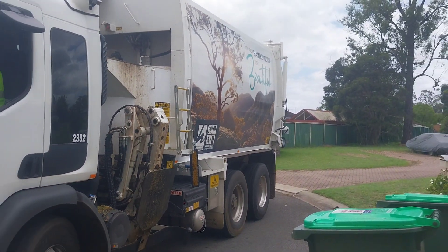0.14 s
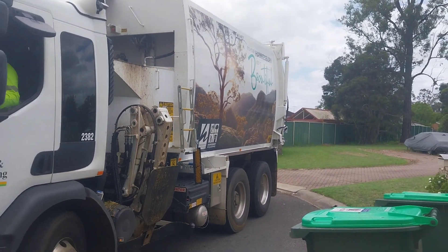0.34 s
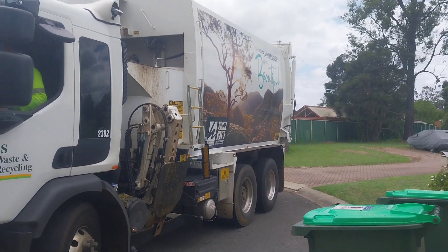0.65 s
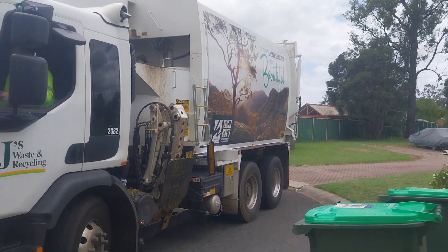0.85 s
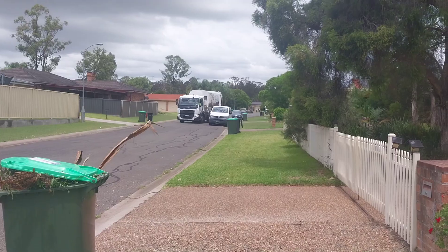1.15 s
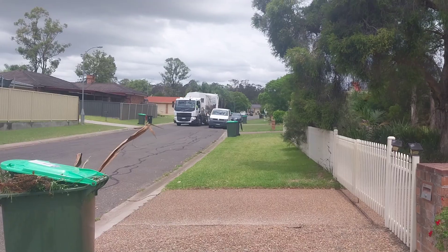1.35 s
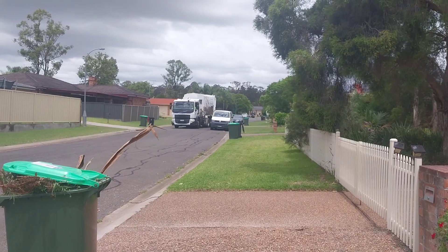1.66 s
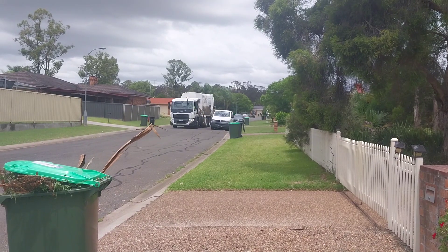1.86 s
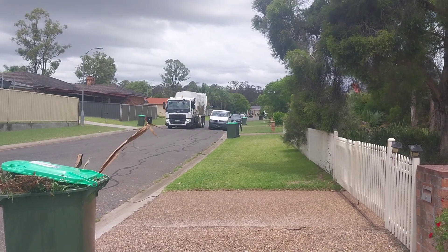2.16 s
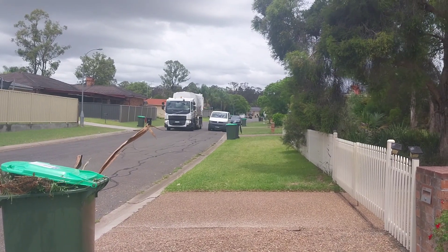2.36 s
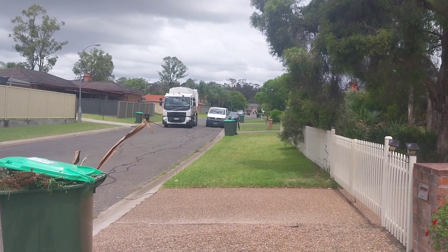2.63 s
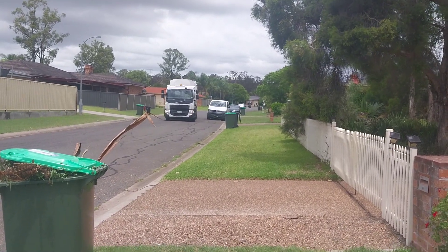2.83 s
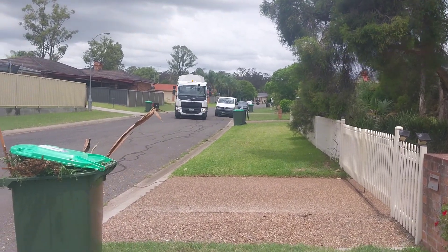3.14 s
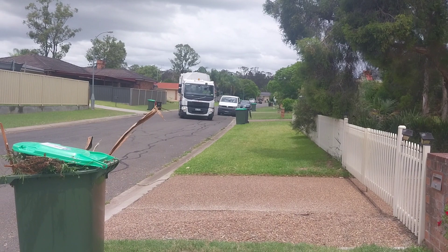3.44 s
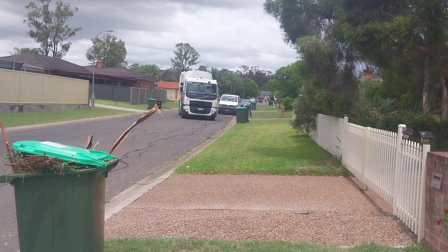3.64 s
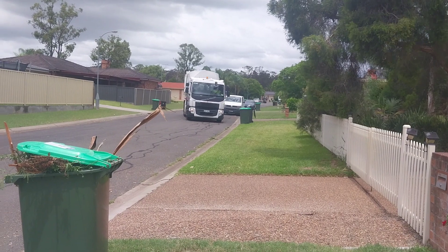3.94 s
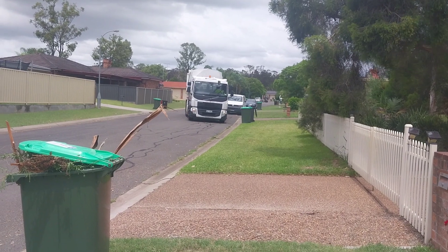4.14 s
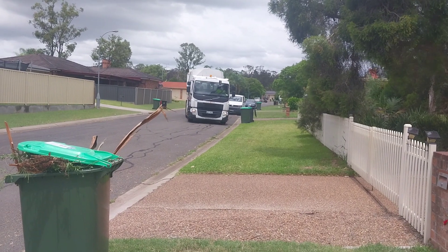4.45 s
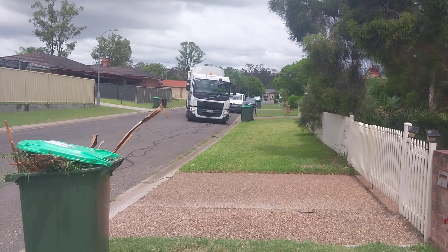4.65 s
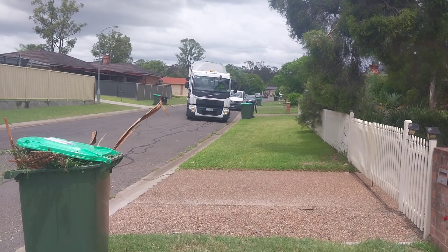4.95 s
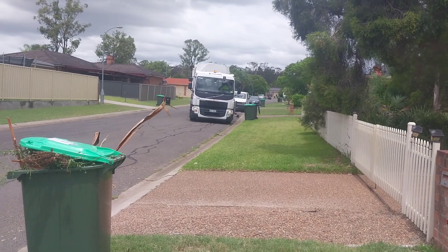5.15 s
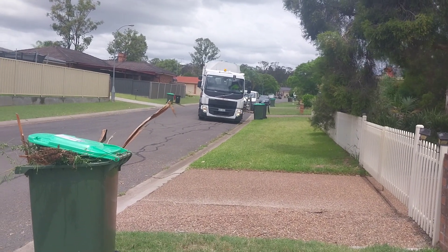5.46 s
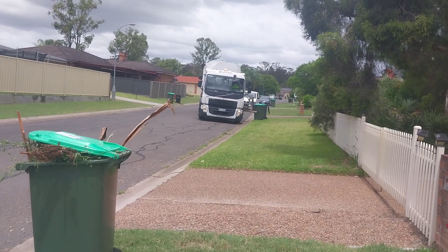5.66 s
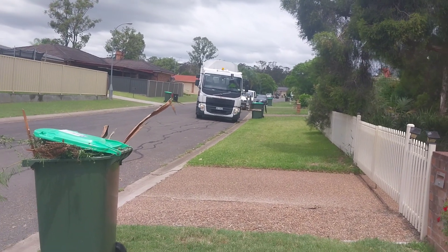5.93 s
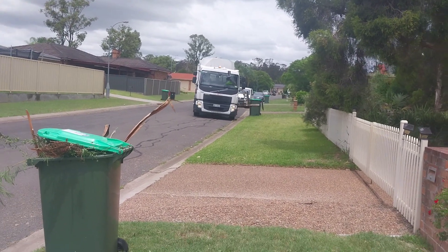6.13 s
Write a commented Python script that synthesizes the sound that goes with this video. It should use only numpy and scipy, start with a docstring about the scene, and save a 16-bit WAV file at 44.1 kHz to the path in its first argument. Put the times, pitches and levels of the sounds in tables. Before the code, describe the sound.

Outdoor handheld camera with stereo microphones. First a loud nearby idle, low and pulsing, under steady oil hiss with a thin sinking whistle, ending in booming steel clanks. A hard cut drops to a far diesel losing revs along the street, lumpy wind on the microphones and a high, stuttering lens-gear whirr close up. Brakes scrape and squeak, a bird chirps on the right, and looser metallic knocks close it.

```python
"""In a street, a garbage truck idles close by: engine noise pulses, oil hisses and the bin arm clanks.
After a cut the truck is far down the breezy street. Its diesel slows as it nears, an air valve puffs,
the brakes squeal and the arm clatters out. A camera's zoom motor buzzes in quick steps and a bird chirps.
Engine, oil, air and wind are shaped noise; squeals, gear whine and chirps are tones with a moving pitch;
each blow of the arm is a set of fading tones plus a burst of noise."""
import sys
import numpy as np
from scipy import signal
from scipy.fft import rfft, irfft, next_fast_len
from scipy.io import wavfile
from scipy.ndimage import uniform_filter1d, map_coordinates

SR = 44100
rng = np.random.default_rng(int(sys.argv[2]) if len(sys.argv) > 2 else 0)


def wrap_up_sound(samples):
    """Save the sound to the file named by the first command line argument, as 16-bit audio."""
    columns = np.atleast_2d(samples).T
    # keep every value between -1 and 1, then stretch to whole-number steps
    tamed = np.clip(columns, -1, 1)
    steps = np.round(tamed * 32767).astype(np.int16)
    wavfile.write(sys.argv[1], SR, steps)


N = 277389
TIME = np.arange(N) / SR
CUT_S = 1.042  # the close scene ends and the street scene begins
TOP_HZ = 15800  # nothing is kept above this pitch

# Truck body shaken by the close engine, relative spectrum: f/Hz, level/dB
BODY_SPECTRUM = [(18, -43), (30, -29), (81, -4), (117, -5), (170, -0.5), (214, 2.5), (252, -3.5), (287, -1),
                 (433, -10), (540, -12.5), (700, -27.5), (1000, -13.5), (1300, -31), (2200, -120)]
# Hiss of oil through the valves, relative spectrum: f/Hz, level/dB
OIL_SPECTRUM = [(470, -3), (800, 0.5), (1040, -17.5), (1130, 0.5), (1280, -3.5), (1750, -6), (2380, -4.5),
                (3090, -6.5), (3770, -6), (4600, -6), (5010, -5.5), (6590, -15), (8650, -34),
                (11100, -17.5), (15500, -29.5)]
# Side the hiss comes from: f/Hz, left minus right/dB
OIL_SIDE = [(1000, -2), (4200, -10), (6000, -14.5), (8200, 4), (10800, -10), (13000, 4)]
# Body panels that ring with the hiss: f/Hz, width/Hz, relative level/dB
PANEL_MODES = [(1124, 29, 4), (2370, 61, -5), (2830, 65, -1), (3720, 100, -2)]
OIL_DB = -27
# A thin valve whistle that slowly sinks; its level is relative to the hiss
WHISTLE_HZ, WHISTLE_SAG_HZ_PER_S, WHISTLE_DB = 5130, 320, -18.5

# Small dry ticks: t/s, starting level/dB, centre f/Hz
TICKS = [(0.47, -20, 2800), (2.414, -29, 1300), (2.911, -30.5, 1300), (3.012, -22.5, 560)]

# Blows of the arm: t/s, thud level before a 7.5 dB cut/dB, thud f/Hz, clash level/dB,
# clash centre f/Hz, time for the clash to fade by 60 dB/s
ARM_BLOWS = [(0.873, -10, 212, -21.5, 4170, 0.18), (.882, -2, 299, -19, 4140, 0.16),
             (.907, -2, 186.5, -28, 1250, 0.088), (0.954, -8, 162.4, -25.5, 4100, 0.091),
             (1, -8, 207, -38, 1000, .05), (5.986, -16, 299, -28.5, 1110, 0.12),
             (5.997, -11.5, 173, -22.5, 1120, 0.028), (6.008, -20, 151, -27.5, 2110, 0.06),
             (6.017, -14, 133.2, -16, 1550, 0.016), (6.054, -12.5, 105, -26, 2150, 0.06),
             (6.108, -21, 260, -26.5, 4620, 0.037), (6.125, -27, 264, -29, 1390, 0.09)]
# Tones of the hollow body: ratio to the thud pitch, relative level/dB, time to fade by 60 dB/s
ARM_TONES = [(.62, -6, 0.19), (1.002, 7, 0.082), (1.17, -12, 0.35), (1.6, -11, 0.11)]
CHATTER_DB, CHATTER_HZ = 3, 300  # loose joints chatter within each clash: depth and rate
REBOUND_S, REBOUND_LOSS_DB = 0.021, 14  # the slack linkage strikes once more after each blow

# Far engine: t/s, firings a second/Hz, load/dB
ENGINE_REVS = [(1.4, 68.6, -1), (2.1, 64.4, 1), (2.5, 54.6, -0.5), (3.0, 44, -6), (3.95, 45, -3.5),
               (4.25, 43.5, -8.5), (4.85, 45, -7.5), (5.4, 43, -4.5), (6.29, 39, -4)]
RUMBLE_DB, BLOCK_DB = -35, -43  # rumble and block clatter at a load of 0 dB
EXHAUST_DB, EXHAUST_DB_PER_OCTAVE = -39.5, 12  # the puffs weaken as the revs fall
# Distance dulls the clatter above this pitch; the treble level rises as the truck nears
TREBLE_HZ, TREBLE_DB, TREBLE_DB_PER_S = 2800, -6, 2.21
# Brief surges of the rumble: t/s, rise in level/dB
RUMBLE_SURGES = [(1.32, 2.5), (3.17, 5.5), (4.56, 9.5), (5.4, 6.5), (6.18, 6.5)]
SURGE_S, CLATTER_SHARE = 0.1, 0.54  # width of a surge, and how far the clatter joins in
# Exhaust and rumble, relative spectrum: f/Hz, level/dB
RUMBLE_SPECTRUM = [(29, -38), (50, -10), (130, -10.5), (200, 3.5), (290, -1.5), (450, -10), (600, -24),
                   (900, -38), (1400, -42)]
# Clatter of the engine block, relative spectrum: f/Hz, level/dB
CLATTER_SPECTRUM = [(300, -1), (500, 4.5), (900, -2), (1300, -1.5), (2500, -1.5), (3500, -7), (5000, -4.5),
                    (15000, -32)]
# Resonances of the engine block: f/Hz, width/Hz, relative level/dB
BLOCK_MODES = [(974, 160, 8), (1614, 98, 1), (2410, 510, -6)]
# Resonances of the engine under throttle: f/Hz, width/Hz, relative level/dB
ROAR_MODES = [(425, 190, 0), (836, 230, -3), (2350, 310, -9)]
ROAR_DB, ROAR_AT_S, ROAR_S = -43, 1.5, 0.76  # level at the peak, time and width of the pull
# Exhaust drone: multiple of the firing rate, relative level/dB
DRONE_ORDERS = [(2.5, -4.5), (3, -2), (5, -7.5), (6, -6.5)]

# Gusts added to the breeze: t/s, level at the peak/dB
WIND_GUSTS = [(2.46, -35), (3.51, -34.5), (3.86, -34.5), (4.57, -27), (5.59, -50), (6.06, -28)]
BREEZE_DB, GUST_S = -38, 0.083  # wind between gusts, width of a gust
# Wind buffeting the microphones, relative spectrum: f/Hz, level/dB
WIND_SPECTRUM = [(15, -29), (30, -11), (55, -1.5), (95, 3), (140, -2.5), (250, -14.5), (600, -48)]

# Zoom motor, MOTOR_GAIN_DB is added to it: t/s, level/dB
MOTOR_LEVELS = [(1.08, -44.5), (1.25, -46), (2.33, -42), (4.73, -42), (4.77, -46), (5.59, -46),
                (5.9, -58.5)]
MOTOR_GAIN_DB = 3  # overall loudness of the zoom motor
# The gear tone swells once: level before the swell, rise, time, width
WHINE_DB, WHINE_RISE_DB, WHINE_AT_S, WHINE_S = -21, 14.5, 2.22, 0.45
# Whirr of the lens gears, relative spectrum: f/Hz, level/dB
GEAR_SPECTRUM = [(2940, -14), (5000, -15), (5430, -15), (6820, -4), (8310, -8.5), (9920, -0.5),
                 (10500, -4.5), (11300, -11.5), (12700, -16.5), (15500, -30)]
# Strands of gear whine: peak t/s, swell width/s, f at the peak/Hz, drift/(Hz/s), width/Hz, relative level/dB
GEAR_STRANDS = [(1.4, 0.63, 8700, 300, 450, -9), (1.9, 0.28, 7050, -200, 600, -9.5),
                (2.56, 0.11, 9640, -3, 110, -7), (2.62, 0.2, 6500, 0, 350, -11.5),
                (3.05, 0.13, 7640, 0, 1100, -3), (3.351, 0.15, 10000, -500, 800, -3.5),
                (3.6, 0.76, 6940, -200, 600, -16), (4.0, 0.081, 9740, -4, 1000, -3),
                (4.8, 0.39, 10040, -200, 130, -7), (5.2, 0.55, 6270, -600, 600, -10.5),
                (5.403, 0.28, 9630, -200, 150, -6)]

# Puffs of the air valve: t/s, swell width/s, centre f/Hz, width/Hz, level at the peak/dB
AIR_PUFFS = [(3.205, 0.035, 1840, 450, -42), (3.228, 0.033, 2770, 1100, -42)]

# Brake squeals: start t/s, length/s, starting f/Hz, glide/(Hz/s), starting level/dB
BRAKE_SQUEALS = [(4.216, 0.2, 13200, 864, -53), (4.35, .35, 12100, 0, -50),
                 (4.772, 0.55, 13370, 200, -50.5), (4.943, 0.35, 11800, 552, -49.5),
                 (5.183, 0.15, 13880, 1200, -57), (5.489, 0.06, 2620, -1000, -33),
                 (5.54, 0.11, 2614, -950, -32), (5.664, 0.069, 2660, -300, -39),
                 (5.777, 0.043, 2326, -1300, -35), (5.82, 0.14, 2290, -900, -45.5),
                 (6.142, 0.068, 5780, -4500, -41), (6.177, 0.11, 5380, 600, -37.5)]
WAVER_HZ, SQUEAL_FADE_DB = 42.3, 5  # how far the pitch wavers; drop in level over each squeal
SCRAPE_AT_S, SCRAPE_S, SCRAPE_DB = 3.45, 0.19, -47.5  # rough scrape: peak time, width, peak level
SCRAPE_HZ, SCRAPE_SAG_HZ_PER_S, SCRAPE_WIDTH_HZ = 1685, 140, 160

# Bird chirps: t/s, level/dB
BIRD_CHIRPS = [(4.895, -52), (5.625, -46.5)]


def amp(db):
    """Turns decibels into a gain."""
    return 10 ** (np.asarray(db) / 20)


def unit(x):
    """x scaled to an average strength (rms) of 1."""
    return x / np.sqrt(np.mean(x ** 2) + 1e-20)


def along(points, hz):
    """Reads a curve of (Hz, value) points on a log pitch axis."""
    f, value = np.transpose(points)
    return np.interp(np.log(hz + 1), np.log(f + 1), value)


def curves(rows):
    """One value per sample for each column after the time."""
    s, *columns = np.transpose(rows)
    return [np.interp(TIME, s, column) for column in columns]


def swells(rows, width_s):
    """A bell-shaped swell for each (time, height) row."""
    return sum(height * np.exp(-.5 * ((TIME - s) / width_s) ** 2) for s, height in rows)


def wobble(rate, size=N):
    """A smooth random curve through a given number of random points a second."""
    knots = rng.standard_normal(int(size * rate / SR) + 4)
    return map_coordinates(knots, [TIME[:size] * rate])


def filtered(x, response):
    """x with each pitch multiplied by a response."""
    n = x.shape[-1]
    m = next_fast_len(n + 8192)
    return irfft(rfft(x, m) * response(np.fft.rfftfreq(m, 1 / SR)), m)[..., :n]


def pair(alike, size=N):
    """White noise at two microphones that hear a share of it alike."""
    a, b = rng.standard_normal((2, size))
    turn = np.arccos(np.clip(alike, 0, 1)) / 2
    return np.cos(turn) * a + np.sin(turn) * np.array([b, -b])


def shaped(x, spectrum):
    """x coloured by a spectrum, at rms 1."""
    return unit(filtered(x, lambda hz: amp(along(spectrum, hz))))


def resonate(x, modes):
    """x through (Hz, width, dB) resonances, at rms 1."""
    def response(f):
        return sum(amp(db) * 1j * f * w / (c * c - f * f + 1j * f * w) for c, w, db in modes)
    return unit(filtered(x, response))


def band(x, centre_hz, octaves):
    """x through a bell-shaped band, at rms 1."""
    return unit(filtered(x, lambda f: np.exp(-.5 * (np.log2((f + 1) / centre_hz) / octaves) ** 2)))


def narrow(hz, width_hz):
    """A fuzzy tone at both microphones that follows a pitch curve, at rms 1."""
    haze = np.array([wobble(width_hz) + 1j * wobble(width_hz) for _ in range(2)])
    turns = np.cumsum(hz * np.ones(N)) / SR
    return unit(np.real(haze * np.exp(2j * np.pi * turns)))


def patchy(x, depth_db):
    """x with patches of neighbouring bands swelling and sinking at random, at rms 1."""
    z = signal.stft(x, nperseg=512)[2]
    field = rng.standard_normal(z.shape[1:])
    for _ in range(2):  # smooth over pitch, then over time
        field = uniform_filter1d(field, size=3, axis=0)
        field = uniform_filter1d(field, size=18, axis=1)
    return unit(signal.istft(z * amp(depth_db * unit(field)), nperseg=512)[1][:, :N])


def widened(x):
    """Stereo widening: each channel gets a late, duller copy of the other; sum and difference get opposite combs."""
    def late_copy(hz):  # 1/820 s late
        return .8 * np.exp(-(hz / 4500) ** 2) * np.exp(-2j * np.pi * hz / 820)
    return unit(x + filtered(x[::-1], late_copy))


def ringing(x, t60, wet_db):
    """x with a dense tail, from a housing's many modes or from the house fronts."""
    t = TIME[:SR // 3]
    tail = rng.standard_normal((2, len(t))) * amp(-60 * t / t60)
    wet = signal.fftconvolve(x, tail / np.linalg.norm(tail[0]), axes=1)[:, :N]
    return (x + amp(wet_db) * wet) / np.hypot(1, amp(wet_db))


def pan(db):
    """Gains for a source that is db louder on the left."""
    return amp(np.array([[db], [-db]]) / 2)


def add(out, s, x):
    """Mixes x into out from time s on."""
    part = out[:, round(s * SR):][:, :x.shape[-1]]
    part += x[..., :part.shape[1]]


def firings(rate, scatter_db):
    """A ringing puff per firing of six unequal cylinders, and the phase of the firing cycle."""
    turns = np.cumsum(rate * (1 + .008 * wobble(12))) / SR
    at = np.flatnonzero(np.diff(np.floor(turns)))
    cylinders = rng.standard_normal(6)[np.arange(len(at)) % 6]
    pulses = np.zeros(N)
    pulses[at] = amp(scatter_db * (cylinders + rng.standard_normal(N)[at]))
    t = TIME[:SR // 10]
    pipe = rng.standard_normal(len(t)) * amp(-60 * t / 0.19)  # each puff rings on in the exhaust
    return signal.fftconvolve(pulses, pipe)[:N], 2 * np.pi * turns


def idling():
    """The close diesel shakes the body; oil hisses unevenly through the valves and rings the panels."""
    pulses, phase = firings(rate=32.4, scatter_db=-1.5)
    knock = amp(1.5 * np.cos(phase) + 1.8 * wobble(55))
    engine = amp(-28.5) * shaped(pulses, BODY_SPECTRUM)
    engine = engine + amp(-24.0) * shaped(pair(0.99) * knock, BODY_SPECTRUM)
    rattle = amp(1.1 * wobble(129.5) + 0.4 * np.cos(2 * phase))
    oil = amp(0.5) * shaped(pair(0.053) * rattle, OIL_SPECTRUM)
    oil += amp(-8.0) * resonate(pair(0.25) * rattle, PANEL_MODES)
    oil = patchy(oil, depth_db=1.0)
    oil += amp(WHISTLE_DB) * narrow(WHISTLE_HZ - WHISTLE_SAG_HZ_PER_S * TIME, width_hz=50)
    oil = filtered(oil, lambda hz: amp(along(OIL_SIDE, hz) * np.array([[.5], [-.5]])))
    oil = ringing(oil, t60=.15, wet_db=-10)
    return engine * pan(-1.7) + amp(OIL_DB) * oil


def ticks():
    """Each small tick close by is a burst of noise in a wide band that dies at once."""
    out, t = np.zeros((2, N)), TIME[:SR // 25]
    for s, db, hz in TICKS:
        add(out, s, amp(db - 60 * t / 0.018) * band(pair(0.6, len(t)), hz, octaves=0.85))
    return out


def arm():
    """Each blow booms in the hollow body while the steel linkage clashes and chatters."""
    out, t = np.zeros((2, N)), TIME[:SR // 3]
    rebounds = [(s + REBOUND_S, thud_db - REBOUND_LOSS_DB, thud_hz,
                 clash_db - REBOUND_LOSS_DB, clash_hz, clash_t60)
                for s, thud_db, thud_hz, clash_db, clash_hz, clash_t60 in ARM_BLOWS]
    for s, thud_db, thud_hz, clash_db, clash_hz, clash_t60 in list(ARM_BLOWS) + rebounds:
        boom = sum(amp(db + rng.normal(0, 1) - 60 * t / t60) * np.sin(2 * np.pi * ratio * thud_hz * t)
                   for ratio, db, t60 in ARM_TONES)
        chatter = amp(CHATTER_DB * np.clip(wobble(CHATTER_HZ, len(t)), -2, 1))
        strike = widened(pair(0.035, len(t))) * chatter
        steel = band(strike, clash_hz, octaves=0.3) + amp(-5) * band(strike, clash_hz, octaves=1.1)
        fade = amp(-60 * t / clash_t60) + amp(-19 - 60 * t / 0.45)  # a faint part has its own fade
        side = pan(-7.5) if s < CUT_S else pan(-1.15)
        blow = amp(thud_db - 7.5) * boom + amp(clash_db) * fade * unit(steel) * side
        add(out, s, blow * (1 - np.exp(-t / .003)))  # soften the first milliseconds
    heard = (TIME < CUT_S) | (TIME > 2 * CUT_S)  # the close blows end with the close scene
    return out * heard


def driving():
    """The far diesel loses revs and load; every firing puffs in the exhaust and rattles the block."""
    rate, load_db = curves(ENGINE_REVS)
    surge_db = swells(RUMBLE_SURGES, SURGE_S)
    firing_db = EXHAUST_DB + EXHAUST_DB_PER_OCTAVE * np.log2(rate / rate[0])
    rumble_db = RUMBLE_DB + load_db + surge_db
    clatter_db = BLOCK_DB + load_db + CLATTER_SHARE * surge_db
    pulses, phase = firings(rate, scatter_db=2.0)
    # each order fades and wavers on its way up the street
    drone = sum(amp(db + 4 * wobble(16)) * np.sin(k * phase + 1.4 * wobble(30))
                for k, db in DRONE_ORDERS)
    exhaust = amp(firing_db) * (shaped(pulses, RUMBLE_SPECTRUM) + unit(drone))
    rumble = amp(rumble_db + 2.3 * wobble(24)) * shaped(pair(0.9), RUMBLE_SPECTRUM)
    knocks = widened(pair(0)) * amp(0.93 * np.cos(phase) + 2.27 * wobble(30))
    clatter = shaped(knocks, CLATTER_SPECTRUM) + amp(-2.5) * resonate(knocks, BLOCK_MODES)
    treble = filtered(clatter, lambda hz: hz ** 4 / (hz ** 4 + TREBLE_HZ ** 4))
    treble_gain = amp(TREBLE_DB + TREBLE_DB_PER_S * (TIME - CUT_S))
    clatter = clatter + (treble_gain - 1) * treble  # brighter as the truck nears
    throttle = resonate(widened(pair(0.8)) * amp(1.5 * np.cos(phase)), ROAR_MODES)
    roar = swells([(ROAR_AT_S, amp(ROAR_DB))], ROAR_S) * throttle
    return (exhaust + rumble) * pan(-0.99) + (amp(clatter_db) * clatter + roar) * pan(-1.5)


def wind():
    """A light breeze with short, lumpy gusts buffets the microphones."""
    strength = amp(BREEZE_DB) + swells([(s, amp(db)) for s, db in WIND_GUSTS], GUST_S)
    return strength * shaped(pair(0.32) * amp(4.55 * wobble(25)), WIND_SPECTRUM)


def zoom_motor():
    """Lens gears whirr in uneven steps, easing off once a frame; strands of whine come and go."""
    motor_db, = curves(MOTOR_LEVELS)
    whine_db = WHINE_DB + swells([(WHINE_AT_S, WHINE_RISE_DB)], WHINE_S)
    frame_hz = 25
    frames = frame_hz * (TIME - .032) + .07 * wobble(12)
    rest = (.5 + .5 * np.cos(2 * np.pi * frames)) ** 3
    steps = unit(amp(-3.7 * rest * (1 + .4 * wobble(7)) + .7 * wobble(60) + .7 * wobble(6)))
    # the gear tones sag at each rest
    speed = 1 - 0.024 * rest ** 2 + 0.00146 * wobble(330) + 0.003 * wobble(4)
    gear_tone = np.sin(2 * np.pi * np.cumsum(10200 * speed) / SR)
    whine = amp(whine_db - 3.5 * rest + 5.1 * wobble(150)) * gear_tone
    strands = sum(swells([(s, amp(db))], width_s) * narrow((hz + drift * (TIME - s)) * speed, width_hz)
                  for s, width_s, hz, drift, width_hz, db in GEAR_STRANDS)
    whirr = patchy(shaped(pair(0.017), GEAR_SPECTRUM), depth_db=2)
    running = np.clip((5.9 - TIME) / 0.11, 0, 1)  # fades out, silent from 5.9 s
    gears = amp(-1.5) * whirr + whine + strands
    return amp(motor_db + MOTOR_GAIN_DB) * running * steps * gears * pan(-1.2)


def air_valve():
    """The valve lets off a puff of air, heard as swelling bands of noise; the street echoes it."""
    out = np.zeros((2, N))
    for s, width_s, hz, width_hz, db in AIR_PUFFS:
        out += swells([(s, amp(db))], width_s) * narrow(hz, width_hz)
    return ringing(out, t60=0.6, wet_db=-7)


def brakes():
    """The linings scrape, then squeal in wavering tones as they slip; the street echoes them."""
    scrape_hz = SCRAPE_HZ - SCRAPE_SAG_HZ_PER_S * (TIME - SCRAPE_AT_S)
    out = swells([(SCRAPE_AT_S, amp(SCRAPE_DB))], SCRAPE_S) * narrow(scrape_hz, SCRAPE_WIDTH_HZ)
    for s, length, start_hz, glide, db in BRAKE_SQUEALS:
        n = int(length * SR)
        u = np.linspace(0, 1, n)  # progress through the squeal
        hz = start_hz + glide * length * u + WAVER_HZ * wobble(394.9, n)
        slips = np.clip(1 + .4 * wobble(130, n), .3, 1.3)  # the lining keeps losing its grip
        flicker = amp(2.5 * np.array([wobble(90, n), wobble(90, n)]))  # separate in each channel
        grip = slips * flicker * np.abs(np.sin(np.pi * u)) ** .3
        add(out, s, amp(db - SQUEAL_FADE_DB * u) * grip * np.sin(2 * np.pi * np.cumsum(hz) / SR))
    return ringing(out, t60=0.6, wet_db=-7)


def bird():
    """A small bird's chirp is one pure tone that sweeps quickly upward."""
    out, t = np.zeros((2, N)), TIME[:SR // 25]
    hz = np.geomspace(5200, 7100, len(t))
    sweep = np.sin(2 * np.pi * np.cumsum(hz) / SR) * np.hanning(len(t))
    for s, db in BIRD_CHIRPS:
        add(out, s, amp(db) * sweep * pan(-21))
    return out


def scene():
    """The close truck up to the cut, then the street; arm, ticks and bird are laid over both."""
    street = driving() + wind() + zoom_motor() + air_valve() + brakes()
    return np.where(TIME < CUT_S, idling(), street) + ticks() + arm() + bird()


def record(dry):
    """The camera keeps nothing above its band limit."""
    return filtered(dry, lambda hz: hz < TOP_HZ)


dry = scene()
out = record(dry)
wrap_up_sound(out)
```